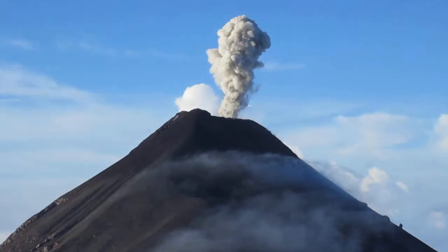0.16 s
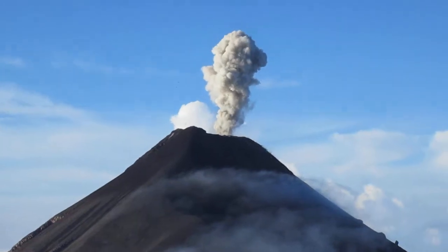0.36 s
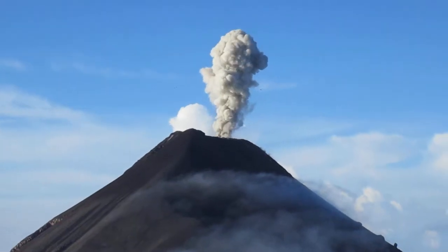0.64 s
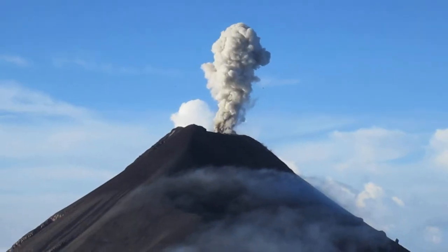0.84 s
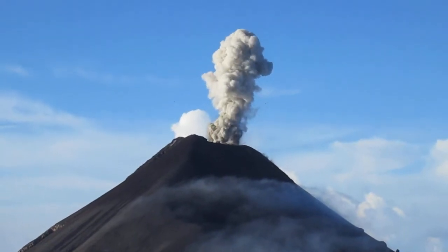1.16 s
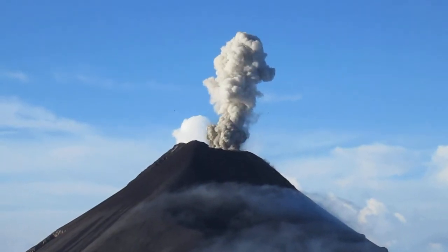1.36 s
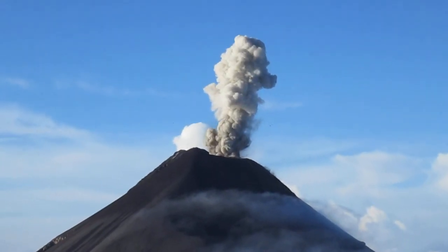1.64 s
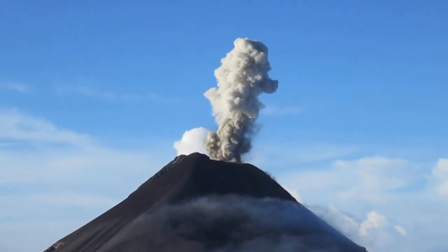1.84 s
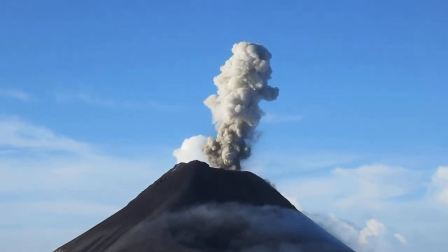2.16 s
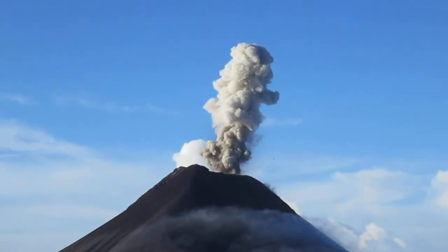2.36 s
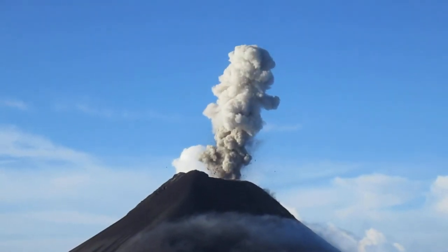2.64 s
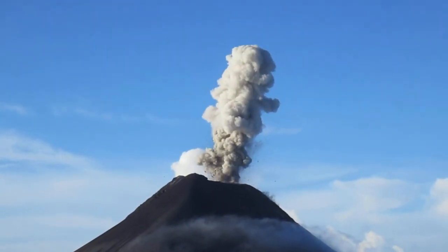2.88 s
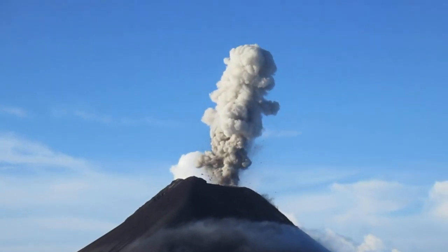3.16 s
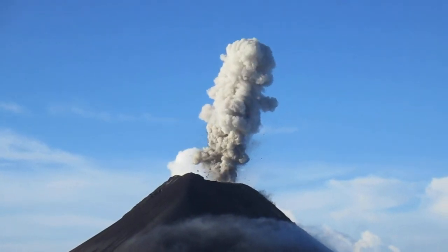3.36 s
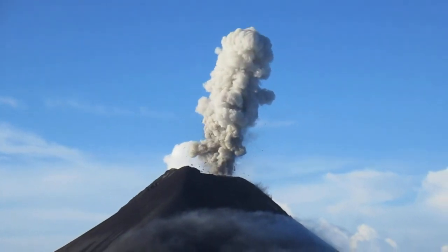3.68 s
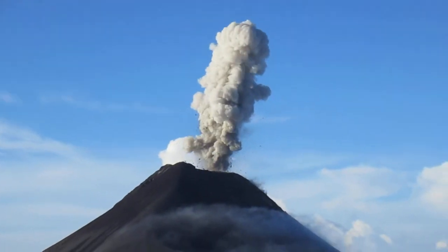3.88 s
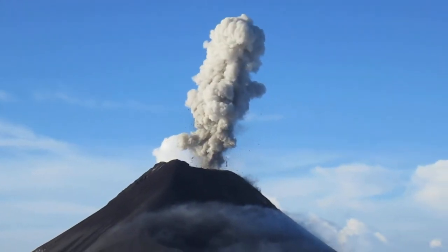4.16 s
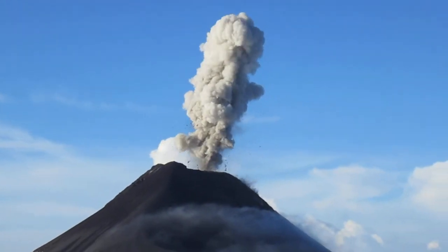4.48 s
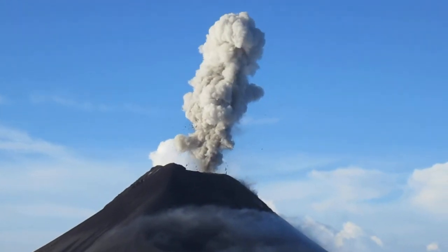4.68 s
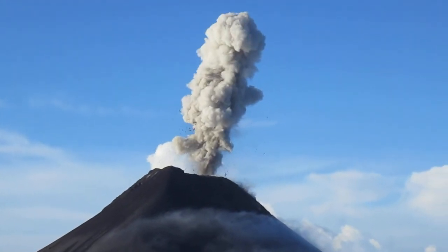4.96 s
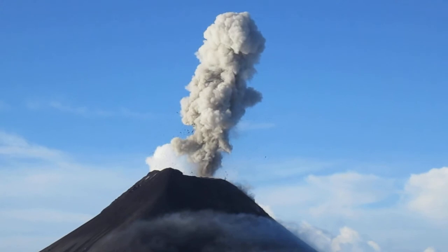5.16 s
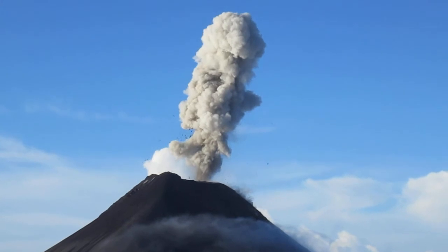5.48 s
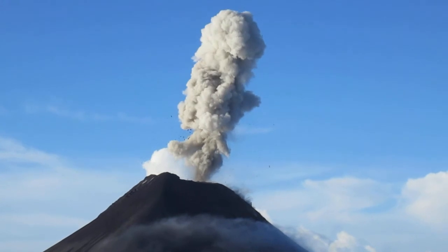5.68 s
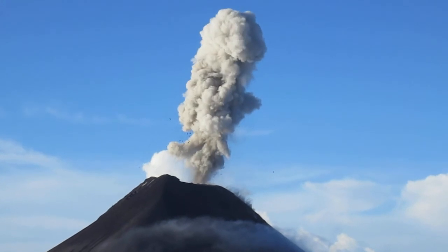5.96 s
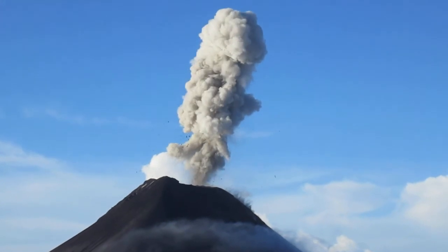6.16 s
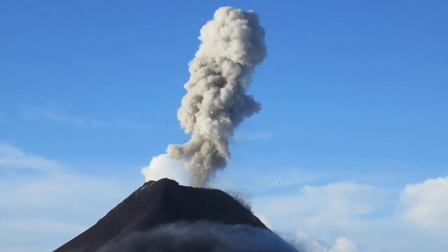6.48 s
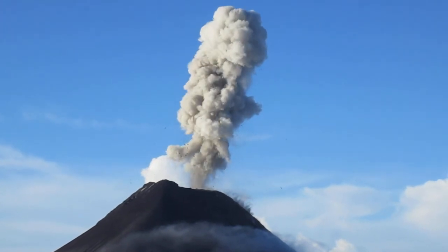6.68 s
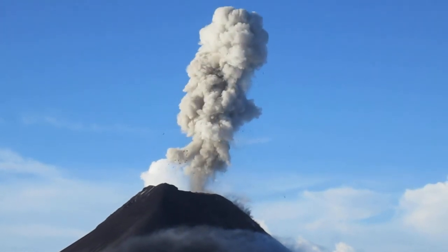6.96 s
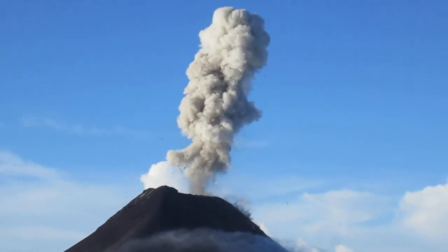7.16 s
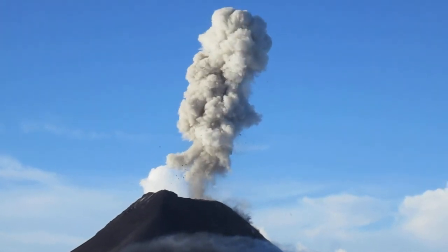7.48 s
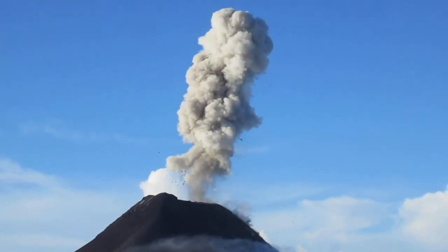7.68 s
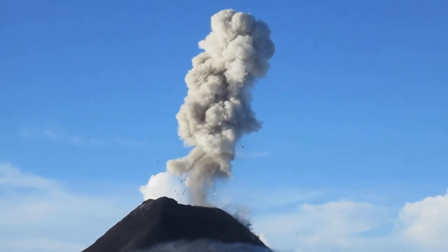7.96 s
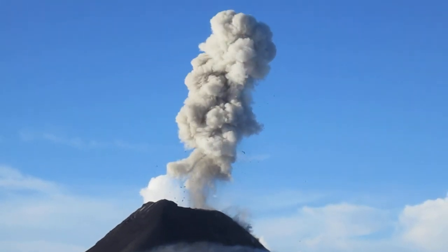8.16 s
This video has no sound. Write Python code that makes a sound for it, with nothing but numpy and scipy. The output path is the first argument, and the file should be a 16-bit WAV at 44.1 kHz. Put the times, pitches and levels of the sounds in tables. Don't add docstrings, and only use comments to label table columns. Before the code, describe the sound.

Quiet mountain air with faint hiss and tiny plastic ticks, then a distant volcano's blast slams in and rolls on as deep, thunderlike rumbling swells.

```python
import sys
import numpy as np
from scipy import signal
from scipy.fft import rfft, irfft, next_fast_len
from scipy.io import wavfile
from scipy.ndimage import uniform_filter1d, minimum_filter1d

SR = 44100
rng = np.random.default_rng(int(sys.argv[2]) if len(sys.argv) > 2 else 0)


def generate_wav(sig):
    pcm = np.round(np.clip(np.atleast_2d(sig).T, -1, 1) * 32767).astype(np.int16)
    wavfile.write(sys.argv[1], SR, pcm)


def invert_db(x):
    u = np.asarray(x, float) / 20
    return 10 ** u


N = 367353
TIME = np.arange(N) / SR
FRONT_S = 1.537
HEAVE_S = .07

# (centre [Hz], width [Hz], depth [dB])
NOTCHES = [(76.4, 5.2, -1), (162.8, 39.8, -19), (351.4, 39.4, -20), (435, 16, -8.5), (1430, 34, -9.5),
           (817, 52, -8)]
# (peak time [s], rise [dB], extra drone [dB])
HEAVES = [(1.57, 6.5, -10), (1.75, 4, -1), (1.96, 6, 4), (2.2, 1.5, 4.5), (2.41, 9.5, -4.5),
          (2.71, 7.5, -2), (2.9, 14.5, -2), (3.18, 5.5, -3.5), (3.41, 4.5, 1), (3.74, 5, 2.5),
          (4.1, 4.5, 0), (4.49, 5.5, 8), (4.68, 3, 5.5), (4.8, 8, 0), (5.1, 1.5, 3), (5.35, 4.5, 2),
          (5.52, 4.5, 9), (5.62, 5.5, -0.5), (5.9, -5, 0), (6.34, 6.5, 5), (6.75, -1, 0.5), (7.05, 3, 2.5),
          (7.2, 5, 1), (7.37, 1.5, 5.5), (7.84, 8.5, -2)]


def rms_one(x):
    return x / np.sqrt(np.mean(x ** 2) + 1e-20)


def in_time(rows):
    s, *columns = np.transpose(rows)
    return [np.interp(TIME, s, column) for column in columns]


def drift(rate_hz):
    r = np.exp(-80 * np.pi * rate_hz / SR)
    noise = rng.standard_normal(N // 40 + 2002)
    slow = signal.lfilter([1], [1, -2 * r, r * r], noise)[2000:]
    return np.interp(np.arange(N) / 40, np.arange(len(slow)), rms_one(slow))


def coloured(x, spectrum, low_hz, high_hz):
    size = next_fast_len(N)
    hz = np.arange(size // 2 + 1) * SR / size + 1
    at_hz, db = np.transpose(spectrum)
    colour = invert_db(np.interp(np.log(hz), np.log(at_hz), db))
    part = 1 / np.sqrt((1 + (low_hz / hz) ** 8) * (1 + (hz / high_hz) ** 8))
    return rms_one(irfft(rfft(x, size) * colour * part, size)[:N])


def peaks(x, rows):
    for hz, width_hz, db in rows:
        a = np.sqrt(invert_db(db))
        k = np.pi * width_hz / SR
        turn = -2 * np.cos(2 * np.pi * hz / SR)
        x = signal.lfilter([1 + k * a, turn, 1 - k * a], [1 + k / a, turn, 1 - k / a], x)
    return x


def burst(x, s, shape):
    out, i = x.copy(), round(s * SR)
    out[i:i + len(shape)] += shape[:N - i]
    return out


def bumps(rows):
    t, out = np.arange(0, N + 40, 40) / SR, 0
    for s, height, length in rows:
        side = np.where(t < s, length, length * 1.04)
        out = out + height * np.exp(-((t - s) / side) ** 2)
    return np.interp(TIME, t, out)


def camera_gain_db():
    # (time [s], drop [dB])
    gain_ducks = [(2.1, 2.5), (2.95, 2), (3.43, 6.5), (3.8, 4.5), (5.4, 3.5), (5.7, 2), (6.4, 1), (7.25, 3)]
    duck_s, recover_db_per_s = .06, 1.9
    dropped = sum(db * np.clip((TIME - s) / duck_s + .5, 0, 1) for s, db in gain_ducks)
    climb = recover_db_per_s * TIME - dropped
    return climb - np.maximum.accumulate(climb)


def background():
    # (frequency [Hz], density [dB per Hz])
    air_colour = [(12, -30), (20, -1.5), (72, -0.5), (433, -13), (692, -6.5), (831, -14.5), (958, -4.5),
                  (1300, -14.5), (2600, -24), (3380, -53), (5720, -120)]
    # (centre [Hz], width [Hz], height [dB])
    housing_tones = [(186, 72, 4.5), (710, 65, 5.5), (960, 160, 6.5), (1515, 160, 8), (1740, 500, 13)]
    # (frequency [Hz], density [dB per Hz])
    hiss_colour = [(1180, -33.5), (2000, -1), (2460, -2), (7190, -7), (7840, -6.5), (9010, -8),
                   (13200, -13.5), (16000, -21)]
    gain_db = camera_gain_db()
    hiss_db = gain_db - 63
    air_db = gain_db - 48 + 2.5 * np.clip(TIME / FRONT_S, 0, 1)
    air, gusts = 0, 1.6 * drift(3.8)
    for low_hz, high_hz, share_db in [(15, 400, -3.5), (400, 1400, -4.5), (1240, 1100, -6.0)]:
        part = coloured(rng.standard_normal(N), air_colour, low_hz, high_hz)
        part = rms_one(peaks(part, housing_tones))
        air = air + part * invert_db(share_db + gusts + 1.1 * drift(6.3))
    hiss = coloured(rng.standard_normal(N), hiss_colour, 1200, 17000)
    hiss = peaks(hiss, [(7920, 270, -6.5)])
    return air * invert_db(air_db) + hiss * invert_db(hiss_db + 2.5 + 0.66 * drift(12))


def whistle():
    # (time [s], pitch [Hz], level [dB])
    motor_line = [(.3, 13500, -84), (.9, 13700, -94), (1.45, 13200, -92), (1.75, 12400, -71),
                  (2.1, 13000, -90.5), (2.7, 13250, -84.5), (3.6, 13300, -84.5), (4.0, 12600, -97),
                  (8.0, 13200, -94)]
    hz, db = in_time(motor_line)
    flecks = invert_db(db - 4 + np.minimum(6 * drift(12), 7))
    unsteady_hz = hz + 90 * drift(7) + 40 * drift(60)
    motor = flecks * np.sin(2 * np.pi * np.cumsum(unsteady_hz) / SR)
    leak_hz, leak_db = 15734, -96
    return motor + invert_db(leak_db) * np.sin(2 * np.pi * leak_hz * TIME)


def ticks():
    # (time [s], peak [dB], ring [Hz], rattle over ring [dB], rattle centre [Hz])
    housing_ticks = [(.58, -45, 2500, -10, 4000), (1.056, -50, 4500, 2, 5000), (1.082, -48, 6800, -3, 6500),
                     (1.22, -49, 6200, -1, 9500), (1.238, -43, 2750, -6, 9000),
                     (1.7562, -50, 2220, 4, 11500), (2.055, -56, 10760, 2, 12100),
                     (2.12, -56, 13200, -5, 13000), (2.8528, -45, 7600, -2, 10000),
                     (2.8875, -34.5, 2530, -3, 5000), (3.0114, -35, 2740, -2, 8550),
                     (5.589, -56.5, 2680, -1.5, 4020), (7.266, -55, 2920, -6, 4000),
                     (8.141, -61, 9000, -2, 10800), (8.2018, -48, 6400, 12, 6500)]
    out, t = np.zeros(N), np.arange(round(0.011 * SR)) / SR
    grains = rng.standard_normal((len(housing_ticks), len(t))) * np.exp(-t / 0.0005)
    for (s, db, hz, rattle_db, rattle_hz), grain in zip(housing_ticks, grains):
        band = signal.butter(2, [rattle_hz / 1.5, rattle_hz * 1.4], "band", fs=SR, output="sos")
        rattle = signal.sosfilt(band, grain)
        ring = np.sin(2 * np.pi * hz * t) * np.exp(-t / 0.0013)
        out = burst(out, s, invert_db(db) * (ring + invert_db(rattle_db + 6.5) * rattle))
    return out


def front():
    height, width_s = .1, .006
    u = (TIME - FRONT_S) / width_s
    swell = .3 * np.exp(-((u + .5) / 1.6) ** 2)
    push = .8 * np.exp(-u ** 2)
    pull = 1.4 * np.exp(-(u - 1.7) ** 2)
    return height * (swell + push - pull)


def vent():
    # (time [s], level [dB], clearness of the air path [dB])
    outflow = [(1.55, -21.5, 3), (1.9, -18.5, -3), (2.16, -24, -1.5), (2.4, -28, -5), (2.58, -36, 2),
               (2.8, -24.5, -3), (3.3, -21.5, -2), (3.45, -15.5, 1.5), (4.15, -18.5, 3.5), (4.35, -24, 2),
               (4.65, -22.5, -1), (5.5, -20, 2.5), (5.76, -22.5, -1), (6.7, -17.5, 5.5),
               (6.85, -27.5, -0.5), (7.19, -13.5, 4), (7.6, -27, 1), (8.06, -39, 0)]
    # (peak time [s], rise [dB], length [s], extra clearness [dB])
    flow_surges = [(1.657, 2, 0.032, -6), (1.703, 3.5, .04, 6), (1.827, 5.5, 0.046, 2),
                   (1.996, 4, 0.048, 4), (2.1, 8, 0.029, -3), (2.245, 4, 0.04, -1), (2.753, 3.5, 0.032, -2),
                   (2.927, 11.5, 0.034, 3.5), (3.092, 10, 0.032, 1.5), (3.176, 4, 0.066, 2),
                   (3.4, 7, 0.046, 0.5), (3.645, -1, 0.033, 4.5), (3.73, 2.5, 0.034, 0.5),
                   (3.893, 4, 0.071, -3), (4.088, 3.5, 0.04, 2.5), (4.216, 4.5, 0.023, 0),
                   (4.55, 6.5, 0.034, 0), (4.858, 7.5, 0.084, -2), (4.968, 4.5, 0.022, -5.5),
                   (5.093, 2.5, 0.037, -7), (5.209, 6, .04, -4), (5.331, 5.5, 0.088, 1),
                   (5.612, 7, 0.094, 4), (5.935, 2, 0.079, 0), (6.104, 4.5, 0.021, 4),
                   (6.188, 3.5, 0.08, -0.5), (6.469, 4, 0.038, -1.5), (7.334, 1, 0.088, 4),
                   (7.76, 8.5, 0.097, -0.5), (7.968, 10.5, 0.079, -2.5)]
    flow_db, clear_db = in_time(outflow)
    body_db = flow_db + bumps([row[:3] for row in flow_surges])
    clear_db = clear_db + bumps([(s, db, length) for s, _, length, db in flow_surges])
    sag_db = 1 * (TIME - FRONT_S)
    heave_db = bumps([(s, db, HEAVE_S) for s, db, _ in HEAVES])
    deep_db = -26 + 0.41 * (flow_db + 20.5) - sag_db + heave_db
    bright_db = -38 + 0.79 * (body_db + 21) + clear_db
    top_db = -65.5 + 1 * (body_db + 19.5) + 1.5 * clear_db
    return body_db, deep_db, bright_db, top_db


def roar():
    # (frequency [Hz], density [dB per Hz])
    roar_colour = [(60, -6), (105, -10.5), (137, 0), (220, -2), (290, -8.5), (420, -1), (520, -9.5),
                   (700, -15.5), (850, -21.5), (1250, -31), (1560, -38), (1800, -48.5), (2100, -50.5),
                   (3300, -78.5)]
    body_db, deep_db, bright_db, top_db = vent()
    drone_db = deep_db - 4.5 + 0.32 * (body_db - deep_db - 6.5)
    drone_db = drone_db + bumps([(s, db, HEAVE_S) for s, _, db in HEAVES])
    arrived = np.clip((TIME - 1.54) / 0.022, 0, 1)
    strikes = rng.random(N) < 1500 / SR
    sizes = invert_db(1.58 * np.minimum(rng.exponential(1, N), 4))
    signs = np.where(rng.random(N) < .8, 1, -1)
    shocks = strikes * sizes * signs
    bands = [(9.9, 77, deep_db - 2.0), (95, 127, drone_db), (157.4, 332, body_db - 0.6),
             (354, 1050, body_db - 7.5), (797, 2120, bright_db), (1810, 4000, top_db)]
    together, out = 0.67 * drift(33), 0
    for low_hz, high_hz, level_db in bands:
        part = coloured(shocks + 0.16 * rng.standard_normal(N), roar_colour, low_hz, high_hz)
        part = rms_one(peaks(part, NOTCHES))
        out = out + part * invert_db(level_db + together + 0.15 * drift(27))
    return out * arrived


def booms():
    # (time [s], peak [dB], ring [Hz])
    single_shocks = [(1.562, -2, 236), (1.644, 0, 253), (1.803, 0, 228), (1.985, 3.5, 210),
                     (2.094, 4.5, 261), (2.263, -0.5, 243), (2.765, -7.5, 261), (2.918, 6, 226),
                     (3.629, 8, 231), (3.697, -6, 448), (3.762, -0.5, 235), (3.917, -27, 468),
                     (4.06, 6.5, 238), (4.221, 4, 226), (4.425, -8.5, 268), (4.538, -4, 252),
                     (4.788, -5, 223), (4.968, -3.5, 274), (5.064, -3, 229), (5.199, 1, 426),
                     (5.315, 3.5, 220), (5.514, -10.5, 255), (5.835, -10, 234), (6.313, -5, 222),
                     (6.438, -4, 210), (7.106, 2, 242.4), (6.82, -13, 270), (7.155, -2, 213),
                     (4.1, -3.5, 225)]
    out, t = np.zeros(N), np.arange(round(.08 * SR)) / SR
    for s, db, hz in single_shocks:
        shape = np.sin(2 * np.pi * hz * t) * (t * hz) * np.exp(-t * hz)
        out = burst(out, s, invert_db(db - 4.5) * shape / shape.max())
    air_path = signal.butter(4, 900, fs=SR, output="sos")
    return signal.sosfilt(air_path, peaks(out, NOTCHES))


def limited(x):
    ceiling = .76
    gain = minimum_filter1d(np.minimum(1, ceiling / (np.abs(x) + 1e-9)), size=881)
    return x * uniform_filter1d(uniform_filter1d(gain, size=441), size=441)


def steepened(x):
    no_offset = signal.butter(1, 8, "high", fs=SR, output="sos")
    return signal.sosfilt(no_offset, x + .17 * x ** 2)


def birds():
    # (time [s], length [s], start pitch [Hz], end pitch [Hz], level [dB])
    bird_calls = [
        (2.5, .1, 4300, 3350, -78),
        (6.13, .11, 4720, 3400, -82),
    ]
    out = np.zeros(N)
    for s, length, from_hz, to_hz, db in bird_calls:
        u = np.linspace(0, 1, round(length * SR))
        swell = np.sqrt(np.sin(np.pi * u) + 1e-9)
        hz = from_hz + (to_hz - from_hz) * u
        out = burst(out, s, invert_db(db) * swell * np.sin(2 * np.pi * np.cumsum(hz) / SR))
    return out


def with_overloads(x):
    # (time [s], peak [full scale], ring [Hz])
    top_shocks = [
        (3.8897, 1.065, 225),
        (5.3208, 1.105, 480),
    ]
    for s, top, hz in top_shocks:
        cycles = (TIME - s) * hz
        gap = 1 - np.exp(-(2 * cycles) ** 4)
        x = x * gap + top * np.cos(2 * np.pi * cycles) * np.exp(-3 * cycles ** 2)
    return x


def scene():
    blast = with_overloads(steepened(limited(roar() + booms()))) + front()
    return (blast + background() + ticks() + whistle() + birds())[None]


def roll_off(x):
    return signal.sosfilt(signal.butter(12, 16370, fs=SR, output="sos"), x)


def record(dry):
    start_s, skip_s, skip_step, cutoff_hz = .2435, 6.4915, 0.36, 15800
    side = np.where(TIME >= skip_s, 1, -1)
    step = skip_step / 2 * side * np.exp(-np.abs(TIME - skip_s) / .002)
    low_pass = signal.ellip(10, .3, 45, cutoff_hz, fs=SR, output="sos")
    cut = signal.sosfilt(low_pass, (dry + step) * (TIME >= start_s))
    return roll_off(np.clip(cut, -1, 1))


dry = scene()
out = record(dry)
generate_wav(out)
```